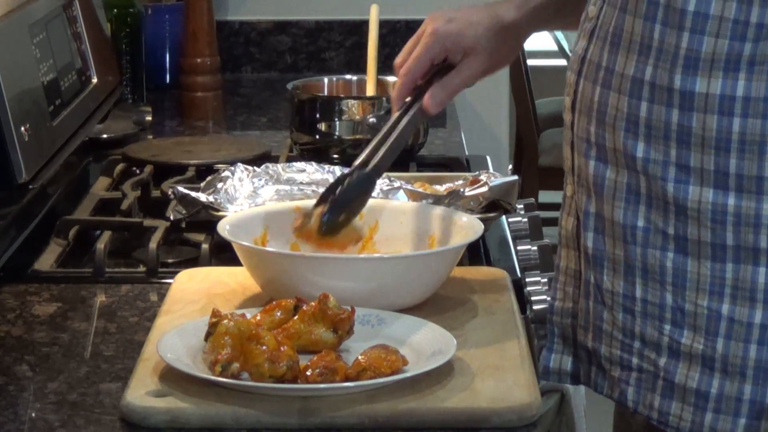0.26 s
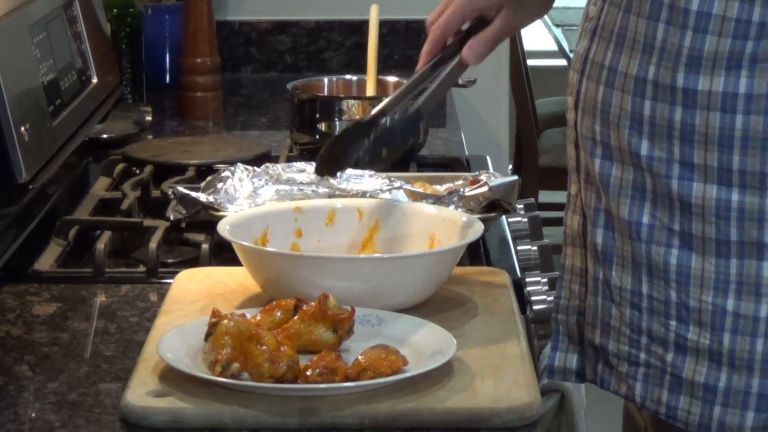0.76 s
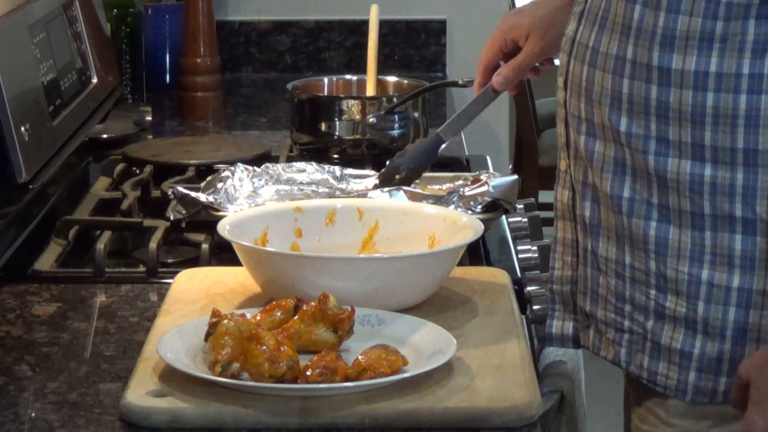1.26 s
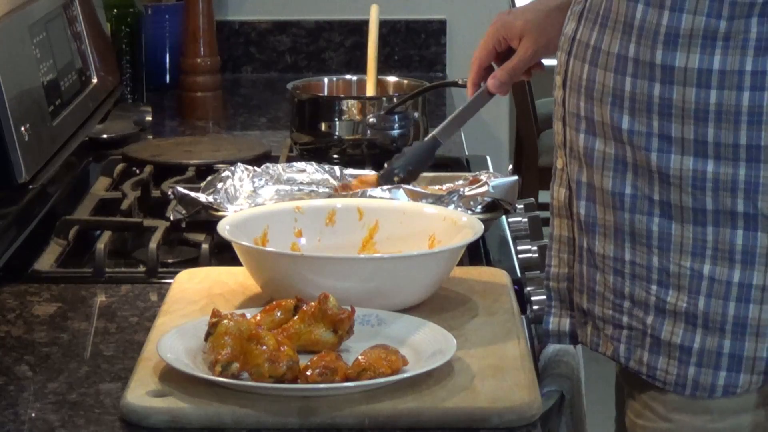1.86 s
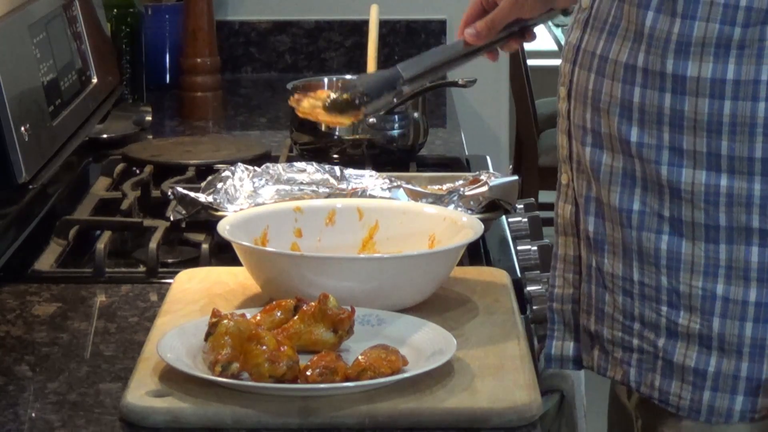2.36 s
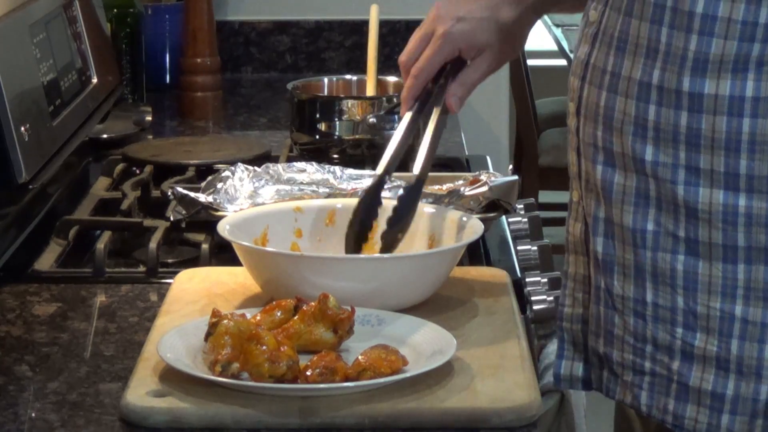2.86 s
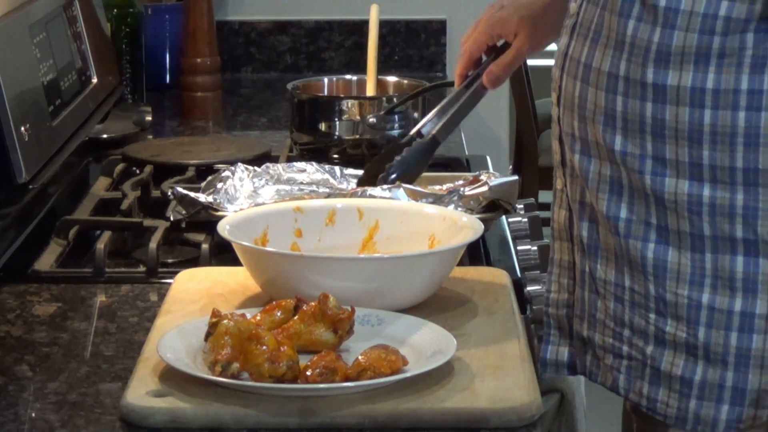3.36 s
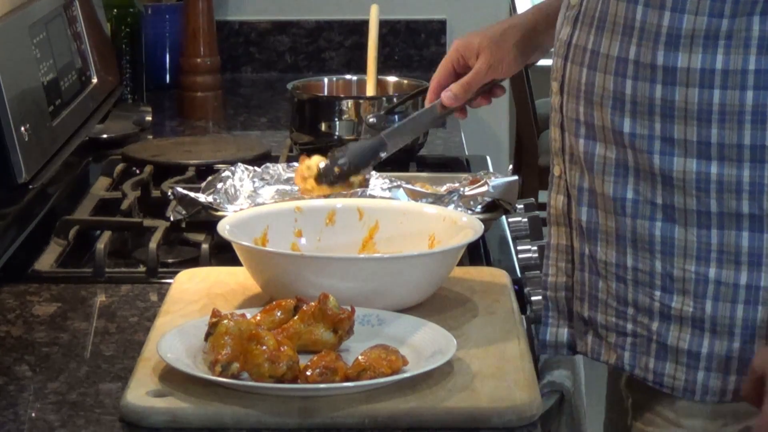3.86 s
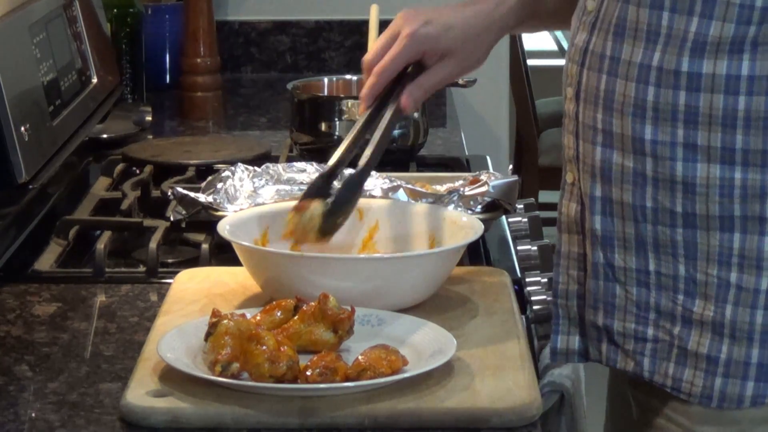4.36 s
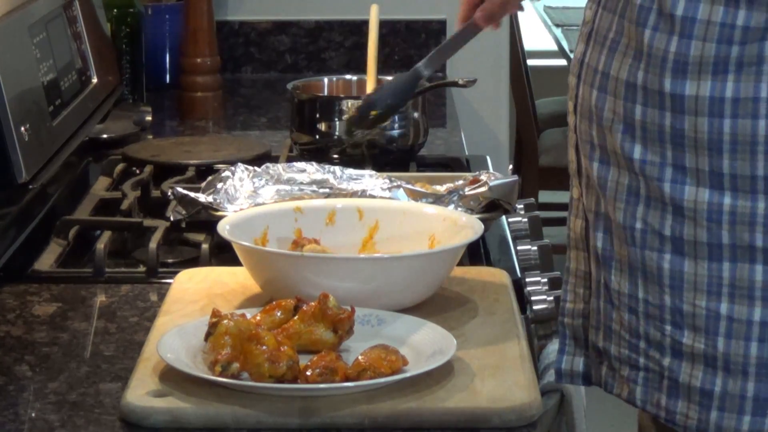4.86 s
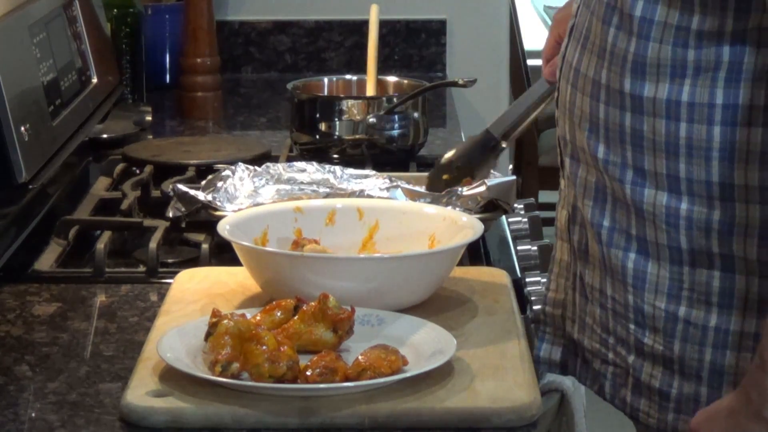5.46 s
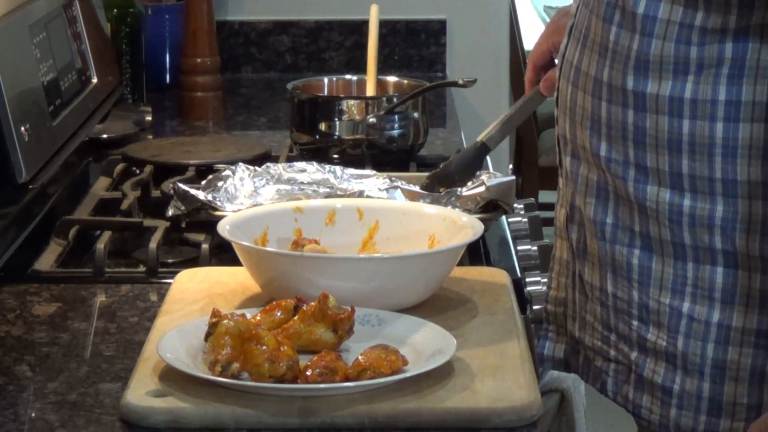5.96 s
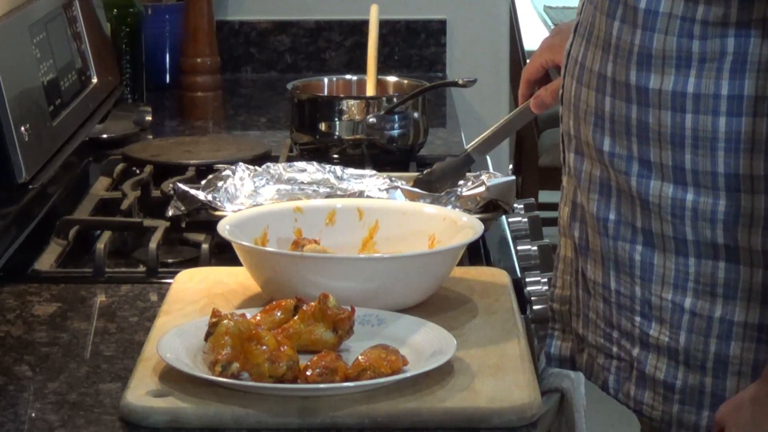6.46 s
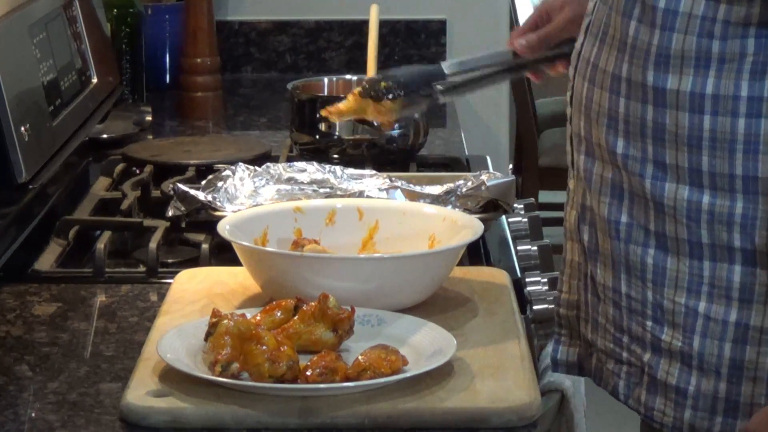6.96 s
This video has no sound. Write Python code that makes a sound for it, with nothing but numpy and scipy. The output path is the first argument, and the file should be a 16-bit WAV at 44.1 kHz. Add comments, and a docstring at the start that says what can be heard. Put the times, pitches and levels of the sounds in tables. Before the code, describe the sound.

Metal tongs move sticky wings from a foil-lined tray to a ceramic bowl. Tiny wet ticks, foil crackles and low tray rumbles build to one sharp tearing crunch with a hollow boom. A quick tong rattle, lighter foil noises and a bright bowl clink with soft wooden knocks come next, then busy crinkling again. Quiet fan noise continues underneath; close indoor pickup with slight echo.

```python
"""A soft fan hum and a faint high whine come first, then a wet pop of sauce and crackling foil.
Kitchen tongs move sauced chicken wings from a foil-lined baking tray to a ceramic bowl.
Noise snaps make the foil, sauce and tong rattle; struck modes make the tray, bowl and board ring.
Stuck wings tear free and the tray slaps back; the tongs clink on the bowl; a small kitchen reflects it all."""
import sys
import numpy as np
from scipy import signal
from scipy.fft import rfft, irfft
from scipy.io import wavfile
from scipy.ndimage import uniform_filter1d

SR = 44100
rng = np.random.default_rng(int(sys.argv[2]) if len(sys.argv) > 2 else 0)


def wav_out(sig):
    """Save sig, one row per channel (or a flat mono array), as 16-bit PCM at SR to the path in sys.argv[1]."""
    wavfile.write(sys.argv[1], SR, np.round(np.clip(np.atleast_2d(sig).T, -1, 1) * 32767).astype(np.int16))


N = 317513
TIME = np.arange(N) / SR

# Every level in the tables is relative: the layers get their own gains in the mix.
# A stuck wing tears free, foil and tray slap back: start_s, crunch_db, sparkle_over_crunch_db,
# drumming_over_crunch_db, thump_db, thump_lowpass_hz
SLAP_EVENTS = [(2.3147, -18.5, -16, 1.5, -15, 1050), (3.693, -26.5, -9, 0, -28.5, 2000),
               (6.1607, -24.5, -9.5, -8, -37, 3060)]


def undb(db):
    """Decibels to gain."""
    return 10 ** (np.asarray(db) / 20)


def unit(x):
    """Scale to an rms of one."""
    return x / np.sqrt(np.mean(x ** 2))


def along(points, hz):
    """Read a table of (Hz, value) on a log-frequency axis; points under 30 Hz count as 30 Hz."""
    point_hz, value = np.transpose(points)
    return np.interp(np.log(np.maximum(hz, 1)), np.log(np.maximum(point_hz, 30)), value)


def shade(x, points):
    """Weight a steady signal by a (Hz, dB) spectrum."""
    gain = undb(along(points, np.fft.rfftfreq(len(x), 1 / SR)))
    return irfft(rfft(x) * gain, len(x))


def response(points, size=2048):
    """Causal (minimum-phase) impulse response of unit energy with a (Hz, dB) spectrum."""
    gain = undb(along(points, np.fft.rfftfreq(size, 1 / SR)))
    cepstrum = irfft(np.log(gain))
    # folding the cepstrum onto its first half puts the energy as early as possible
    cepstrum[1:size // 2] *= 2
    cepstrum[size // 2 + 1:] = 0
    h = irfft(np.exp(rfft(cepstrum)))
    return h / np.linalg.norm(h)


def through(x, h):
    """Pass a signal through an impulse response."""
    return signal.fftconvolve(x, h)[:N]


def lowpass(x, hz):
    """Second-order low-pass."""
    return signal.sosfilt(signal.butter(2, min(hz, SR / 2 - 1000), fs=SR, output="sos"), x)


def ring(modes):
    """A struck body: fading modes of alternating sign, scaled by their joint strength."""
    t = TIME[:SR]
    hz, db, t60 = np.transpose(modes)[:, :, None]
    sign = (-1) ** np.arange(len(modes))[:, None]
    fading = undb(db - 60 * t / t60) * np.cos(2 * np.pi * hz * t)
    return np.sum(sign * fading, axis=0) / np.linalg.norm(undb(db))


def burst(start, fade, rise=0.0024):
    """Envelope with a quick rise and an exponential fade; both are time constants in seconds."""
    age = np.maximum(TIME - start, 0)
    return (1 - np.exp(-age / rise)) * np.exp(-np.minimum(age / fade, 50))


def held(start, length, attack, release):
    """Envelope of one stroke: the tongs bear down, hold and ease off."""
    age = np.maximum(TIME - start, 0)
    return (1 - np.exp(-age / attack)) * np.exp(-np.clip((age - length) / release, 0, 50))


def walk(rate):
    """Slow random drift through 'rate' random knots per second."""
    knots = rng.standard_normal(1024)
    return uniform_filter1d(np.interp(TIME * rate, np.arange(len(knots)), knots), 512)


def crackle(per_s, spread_db, size=700):
    """Tiny random snaps of unequal size, levelled so that they release energy at a steady rate."""
    snaps = (rng.random(N) < per_s / SR) * rng.choice([-1, 1], N) * undb(spread_db * rng.standard_normal(N))
    local_power = uniform_filter1d(snaps ** 2, size)
    return snaps / np.sqrt(np.maximum(local_power, 1e-6))


def blows(rows):
    """One push for each (s, dB, Hz); a softer contact has less treble."""
    # the tiny offset keeps the filters from slowing down on vanishing numbers
    return sum(undb(db) * lowpass(signal.unit_impulse(N, int(s * SR)) + 1e-18, hz) for s, db, hz in rows)


def background():
    """Fan noise that flutters a little, wavering hum, a faint tone pulsing 30 times a second, a high whine."""
    # fan noise spectrum: pitch_hz, level_db
    air_colour = [(15, -68), (25, -39), (48, -13), (91, -15), (173, -7.5), (209, -11), (297, -4.5),
                  (331, -12.5), (359, -2.5), (389, -4), (703, -8), (1900, -16), (3170, -17.5), (13900, -23),
                  (15500, -23)]
    # noise in the side channel over the mid, before a further 1 dB cut: pitch_hz, side_minus_mid_db
    air_spread = [(60, -27), (110, -24), (200, -15), (380, -12.5), (700, -6), (1290, -1.5), (2380, -0.5),
                  (4400, -3.5), (8120, -10.5), (15000, -55)]
    # fan and mains lines: pitch_hz, level_db, waver (0 steady to 1)
    hum_lines = [(59, -81, 0), (119.6, -79.5, 0.54), (137, -79, 0.6), (186, -73, 0.69),
                 (240.3, -71.5, 0.47), (303.7, -68.5, 0.36), (354.6, -69, 0.65), (479, -70.5, 0.5),
                 (694, -71.5, 1)]
    mid, side = (unit(shade(rng.standard_normal(N), air_colour)) * undb(-57.87 + 1.3 * walk(12))
                 for _ in range(2))
    for hz, db, waver in hum_lines:
        drift = (1 - waver) + waver * (walk(4.7) + 1j * walk(10.0))
        mid = mid + undb(db) * unit(np.real(drift * np.exp(2j * np.pi * hz * TIME)))
    gate = np.cos(np.pi * 30 * TIME) ** 10  # the even power gives 30 pulses a second
    mid = mid + undb(-70.5) * unit(gate * np.sin(2 * np.pi * 3200 * TIME + 1.03 * walk(60)))
    mid = mid + undb(-66.0) * np.sin(2 * np.pi * 15735 * TIME)  # whine
    return mid, undb(-1) * shade(side, air_spread)


def reflections(build_s=0.0054):
    """The kitchen's echo: noise that builds up quickly and whose treble dies first."""
    # reverberation time: pitch_hz, t60_s
    room_decay = [(150, 0.44), (600, 0.63), (2000, 0.52), (5000, 0.44), (10000, 0.36), (16000, 0.23)]
    hz, frames, cells = signal.stft(rng.standard_normal(SR), SR, nperseg=256)
    fading = cells * undb(-60 * frames / along(room_decay, hz)[:, None])
    tail = signal.istft(fading, SR)[1][:SR]
    tail = tail * (1 - np.exp(-TIME[:SR] / build_s))
    return tail / np.linalg.norm(tail)


def sauce():
    """Sticky threads and films of sauce let go of the tongs and pop in short wet clusters."""
    # clusters: start_s, level_db, fade_s, lowpass_hz
    squelch_events = [(0.543, -38, 0.0031, 8900), (0.5813, -40.5, 0.0074, 7850),
                      (0.676, -36.5, .011, 12000), (.69, -62, 0.01, 11000), (2.859, -41, 0.0079, 5000)]
    # spectrum of a pop: pitch_hz, level_db
    sauce_colour = [(400, -46), (900, -19), (1200, -4.5), (1800, -1), (3200, 0.5), (5000, -0.5), (7000, -1),
                    (10000, -1), (15000, -33)]
    pops = through(crackle(per_s=1500, spread_db=-2.5), response(sauce_colour))
    return sum(undb(db) * lowpass(pops * burst(s, fade), hz) for s, db, fade, hz in squelch_events)


def board():
    """Cushioned blows rock the bowl on its wooden board and ring the board's modes."""
    # soft knocks: start_s, level_db, lowpass_hz
    knock_events = [(2.9105, -29, 1990), (2.921, -41, 1200), (4.531, -29, 586), (4.796, -36, 417),
                    (4.815, -59, 400), (5.087, -52.5, 503)]
    # modes of the wood: pitch_hz, level_db, t60_s
    board_modes = [(105, -38, 0.25), (259.6, -12.5, 0.38), (356, -4.5, 0.067), (481, 5.5, 0.041),
                   (598, -5, 0.087), (698.6, -10, 0.6), (806, 1.5, 0.047), (922, -0.5, 0.07),
                   (1123, -12, 0.023), (1272, 3, 0.051), (1353, -5, 0.12), (1710, -6, 0.032),
                   (1879, -3, 0.042)]
    return through(blows(knock_events), ring(board_modes))


def tongs():
    """The loose arms of the tongs clack in short rattles, damped by the hand."""
    # clacks: start_s, level_db, fade_s, lowpass_hz
    clack_events = [(2.8878, -28, 0.0042, 13000), (2.8954, -34.5, 0.0018, 16000),
                    (2.904, -48, 0.0017, 16000), (2.910, -35, 0.0067, 13000), (2.912, -43, 0.0065, 1680)]
    # spectrum of the rattle: pitch_hz, level_db
    tongs_colour = [(500, -15), (850, -4), (1150, 2), (2200, -8.5), (3500, -10.5), (5500, -7.5), (6050, -7),
                    (6900, -16), (8200, -13), (9200, -17), (11500, -10), (15000, -27)]
    rattle = through(crackle(per_s=12000, spread_db=3), response(tongs_colour))
    return sum(undb(db) * lowpass(rattle * burst(s, fade, rise=0.00025), hz)
               for s, db, fade, hz in clack_events)


def bowl():
    """The tong tips chatter on the glaze and set the bowl ringing until food damps it."""
    # tong tips on the bowl: start_s, ring_db, contact_tick_db
    clink_events = [(4.5309, -25, -23), (4.5368, -44, -31), (4.692, -54, -35.5), (4.766, -48, -45)]
    # modes of the ceramic: pitch_hz, level_db, t60_s
    bowl_modes = [(716, -23, 2.4), (1346, -28, 1.5), (2132, -13, 0.99), (3030, -4.5, 0.2),
                  (4032, -18, 0.21), (5136, -1, 0.033), (5220, -16, 0.11), (6200, -6, 0.13),
                  (6350, -12, 0.37), (6670, 2.5, 0.057), (7000, -6, 0.15), (7445, -27.5, .2),
                  (7780, -11, .17), (7977, -6.5, 0.21), (8500, -21, .17), (8600, -17, .15),
                  (9000, -2, 0.13), (9360, 1, 0.096), (9700, -17, 0.18), (10000, -15, 0.19),
                  (10260, -12, 0.043), (11600, -32, .2), (12630, -7, 0.13)]
    # spectrum of a contact tick: pitch_hz, level_db
    tick_colour = [(300, -41), (1000, -13), (2000, -23), (4000, -22), (6500, -11), (9000, -3), (10800, 0.5),
                   (12000, -23), (13500, -22), (16000, -31)]
    strikes = blows([(s, ring_db, 16000) for s, ring_db, tick_db in clink_events])
    contact = sum(undb(tick_db) * burst(s, fade=0.0099, rise=0.00016) for s, ring_db, tick_db in clink_events)
    ticks = through(contact * crackle(per_s=13000, spread_db=1.5), response(tick_colour))
    hush_s = 4.79  # a wing drops against the bowl and stops its ring
    damping = np.exp(-np.maximum(TIME - hush_s, 0) / 0.021)
    return undb(2.0) * through(strikes, ring(bowl_modes)) * damping + undb(-4.0) * ticks


def tray(push):
    """The metal tray's modes rumble under the dragging tongs and boom when it slaps back."""
    # modes of the metal: pitch_hz, level_db, t60_s
    tray_modes = [(237, -22, 0.5), (502, -9, 0.35), (517, -4.5, 0.12), (576.8, 3.5, 0.24),
                  (595, -2.5, 0.23), (608, -7, 0.16), (637, -5, 0.23), (688.7, -7.5, 0.34), (731, -5, 0.19),
                  (772, -13.5, 0.22), (900, -9.5, 0.13), (874, -12.5, 0.25), (964, -2, 0.34),
                  (1004, -11, 0.36), (1168, -6, 0.26), (1254, -7, 0.15), (1384, -6.5, 0.2),
                  (1624, -10, 0.15)]
    thump_lag_s = 0.003944  # the boom follows the tear
    body = ring(tray_modes)
    rumble = crackle(per_s=1600, spread_db=5.0) * push / np.linalg.norm(body)
    thumps = blows([(s + thump_lag_s, thump_db, hz)
                    for s, db, sparkle_db, tray_db, thump_db, hz in SLAP_EVENTS])
    return through(undb(-6.0) * rumble + thumps, body)


def foil_effort():
    """How hard the foil crinkles, sparkles and pushes on the tray; all events add in power."""
    # the tongs push or drag on the foil: start_s, length_s, attack_s, crinkle_db,
    # sparkle_over_crinkle_db, tray_rumble_over_crinkle_db
    stroke_events = [(1.246, 0.16, 0.054, -45.5, -2, -5), (1.453, 0.28, 0.023, -51.5, -1.5, 0),
                     (1.71, .15, 0.028, -45, -3, -4.5), (1.885, 0.27, 0.02, -49.5, -3.5, -7),
                     (3.433, .12, .018, -55, -2, -4.5), (3.625, 0.058, 0.026, -50.5, -5, -10),
                     (3.737, .085, 0.011, -47, -0.5, 1), (5.381, 0.17, 0.029, -45, -3, -4),
                     (5.54, .095, 0.019, -37, 0.5, -8), (5.628, .075, 0.013, -40.5, -11, -3.5),
                     (5.797, 0.056, .012, -46, -5, -4.5), (5.897, 0.12, 0.019, -53, -20, -1.5),
                     (6.028, .077, 0.027, -35.5, 1.5, -8.5), (6.166, 0.077, 0.012, -41.5, -19, 1.5),
                     (6.547, .05, 0.017, -48, -4, 1.5)]
    # a fold of foil buckles at once: start_s, level_db, sparkle_over_level_db
    buckle_events = [(1.384, -48.5, 7), (1.452, -36.5, -13), (1.555, -38.5, -5), (1.616, -37.5, 0.5),
                     (1.665, -38.5, 5), (1.799, -34.5, -2.5), (1.931, -37, 4.5), (1.965, -35.5, 4.5),
                     (2.034, -40.5, 8), (2.077, -33.5, 3.5), (2.313, -16.5, 4.5), (3.445, -46, -5),
                     (3.657, -43, -0.5), (3.739, -44, 7), (3.858, -50.5, 4), (5.39, -38.5, -1),
                     (5.556, -39.5, 6), (5.612, -37.5, 9), (5.752, -40, 2.5), (5.872, -35, -28),
                     (6.046, -38, 7), (6.187, -32, 4), (6.492, -54, -2), (6.536, -45.5, -8),
                     (6.582, -43, -9), (6.703, -49, -33)]
    # the tongs and the food bump the tray through the foil: start_s, level_db
    bump_events = [(1.456, -40), (1.713, -36.5), (1.792, -38.5), (2.337, -20.5), (3.565, -48), (5.389, -44),
                   (5.668, -34), (6.189, -28)]
    release_s = 0.029
    settle_db, settle_s = -13.5, 0.15  # after a stroke the broad folds relax quietly
    rock_db, rock_s = -7.5, 0.19  # and the tray goes on rocking
    buckle_tray_db, buckle_rise_s, buckle_fade_s = -24, 0.0011, 0.015
    slap_rise_s, slap_fade_s = 0.0016, 0.02

    crinkle, sparkle, push = np.full((3, N), 1e-20)  # never quite zero, for the ratio taken in foil()
    for s, length, attack, db, sparkle_db, tray_db in stroke_events:
        press, settle, rock = (undb(db) * held(s, length, attack, release)
                               for release in (release_s, settle_s, rock_s))
        crinkle += np.maximum(press, undb(settle_db) * settle) ** 2
        sparkle += (undb(sparkle_db) * press) ** 2
        push += (undb(tray_db) * np.maximum(press, undb(rock_db) * rock)) ** 2

    jolts = [(s, db, sparkle_db, buckle_tray_db, buckle_rise_s, buckle_fade_s)
             for s, db, sparkle_db in buckle_events]
    jolts += [(s, db, sparkle_db, tray_db, slap_rise_s, slap_fade_s)
              for s, db, sparkle_db, tray_db, thump_db, hz in SLAP_EVENTS]
    for s, db, sparkle_db, tray_db, rise, fade in jolts:
        power = (undb(db) * burst(s, fade, rise)) ** 2
        crinkle += power
        sparkle += undb(sparkle_db) ** 2 * power
        push += undb(tray_db) ** 2 * power

    push += sum((undb(db) * burst(s, fade=0.016)) ** 2 for s, db in bump_events)
    return np.sqrt([crinkle, sparkle, push])


def scatter(x, fade, count=10):
    """Each patch of foil shivers in its own way for a few milliseconds; the snaps hop between patches."""
    t = TIME[:2048]
    patch = np.repeat(rng.integers(0, count, N // 64 + 1), 64)[:N]  # a new patch every 64 samples
    out = 0
    for k in range(count):
        shiver = rng.standard_normal(len(t)) * (np.exp(-t / fade) + 3 * np.exp(-t / 0.00059))
        out = out + through(x * (patch == k), shiver / np.linalg.norm(shiver))
    return out


def foil(crinkle, sparkle, push):
    """Creases snap: broad folds crunch, small ones sparkle, and the sheet drums on the tray under it."""
    # spectrum of a snapping crease: pitch_hz, level_db
    foil_colour = [(70, -50), (160, -39), (400, -20.5), (560, -20.5), (950, -22), (1500, -15), (2300, -11),
                   (3700, -10.5), (5500, -14), (7200, -19), (10300, -12), (12500, -20), (16000, -35)]
    # spectrum of foil drumming on the tray: pitch_hz, level_db
    liner_colour = [(120, -47), (240, -23.5), (420, -18.5), (520, -0.5), (600, 3), (700, -1), (850, -1),
                    (1050, -4), (1450, -9.5), (3000, -30)]
    snaps = crackle(per_s=3200, spread_db=3.0)
    broad = shade(snaps, [(2200, 4.0), (3200, -13.0), (5000, -28)])
    fine = snaps - shade(snaps, [(4500, 2.0), (6200, -1), (9000, -23)])
    middle = snaps - broad - fine
    # middle-sized creases follow both the broad and the fine ones
    middle_effort = crinkle * (sparkle / crinkle) ** 0.33
    creases = broad * crinkle + middle * middle_effort + fine * sparkle
    sheet = through(scatter(creases, fade=0.0076), response(foil_colour))
    drumming = through(crackle(per_s=1500, spread_db=4.0) * push, response(liner_colour))
    return undb(4.5) * sheet + undb(-3.0) * drumming


def scene():
    """Direct sound sits in the middle, reflections spread left and right, then the channels are offset."""
    # spread of the reflections: pitch_hz, side_minus_mid_db
    room_spread = [(60, -16), (200, -19), (700, -10), (1300, -7.5), (2400, -9.5), (4400, -8), (8000, -5.5),
                   (15000, -57)]
    # phase between the channels: pitch_hz, left_lead_radians
    channel_phase = [(60, 0.12), (300, -0.22), (780, -0.49), (1500, -0.51), (4200, -0.31), (16000, -0.019)]
    # level between the channels: pitch_hz, left_minus_right_db
    channel_lean = [(100, 0.5), (600, -0.7), (1200, -0.7), (2500, 0), (12000, -0.1)]
    crinkle, sparkle, push = foil_effort()
    crunch, boom = foil(crinkle, sparkle, push), tray(push)
    clinks, handling = bowl(), tongs() + board() + sauce()
    direct = crunch + boom + clinks + handling
    into_room = undb(-8.0) * crunch + undb(-9) * boom + undb(-8) * clinks + undb(-4.5) * handling
    air_mid, air_side = background()
    mid = direct + through(into_room, reflections()) + air_mid
    side = shade(through(into_room, reflections()), room_spread) + air_side
    # the low mids come a little earlier and louder on the right
    hz = np.fft.rfftfreq(N, 1 / SR)
    turn = np.exp(0.5j * along(channel_phase, hz)) * undb(0.5 * along(channel_lean, hz))
    left = irfft(rfft(mid + side) * turn, N)
    right = irfft(rfft(mid - side) / turn, N)
    return np.array([left, right])


def record(dry):
    """Cut the deepest bass gently, limit to full scale and cut the top steeply."""
    thin = signal.sosfilt(signal.butter(1, 20, "high", fs=SR, output="sos"), dry)
    return signal.sosfilt(signal.ellip(10, 0.2, 80, 16000, fs=SR, output="sos"), np.clip(thin, -1, 1))


dry = scene()
out = record(dry)
wav_out(out)
```